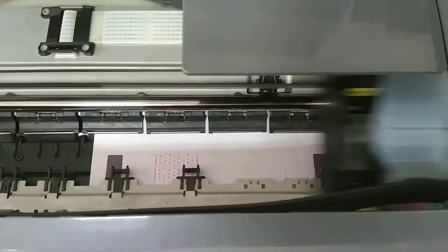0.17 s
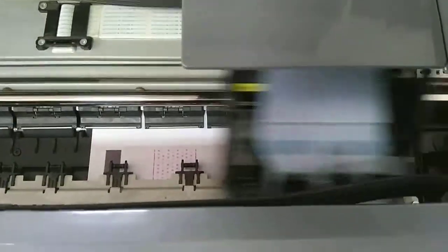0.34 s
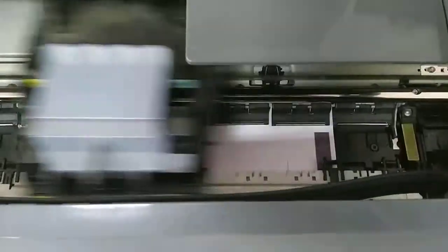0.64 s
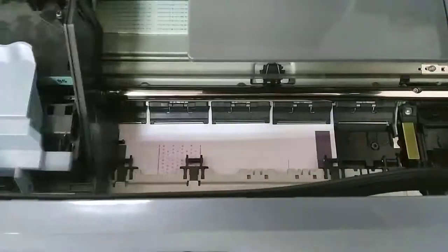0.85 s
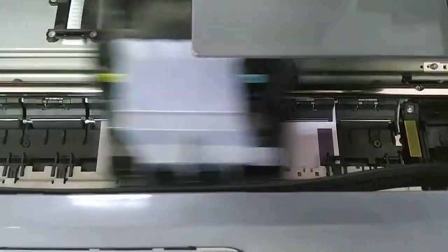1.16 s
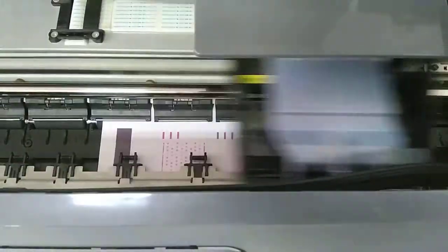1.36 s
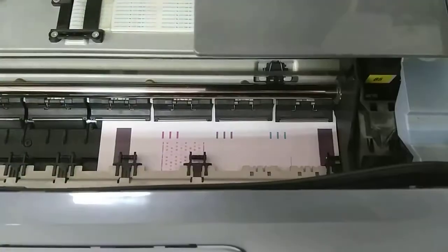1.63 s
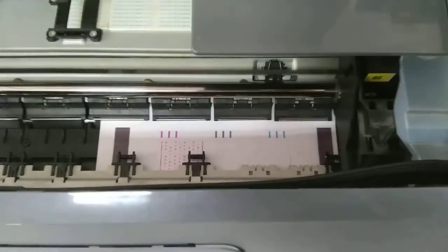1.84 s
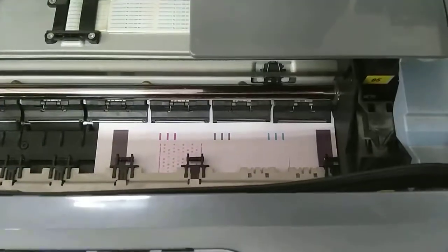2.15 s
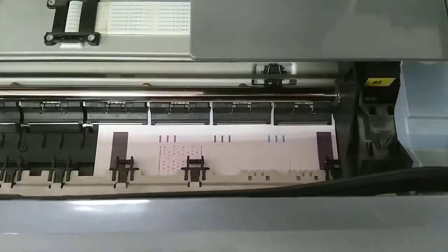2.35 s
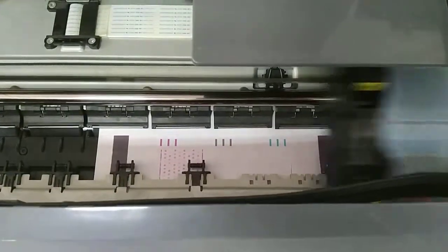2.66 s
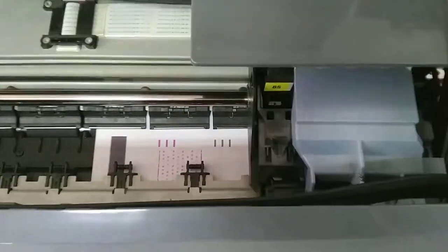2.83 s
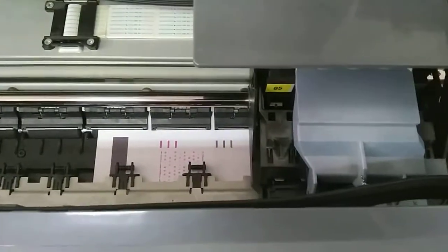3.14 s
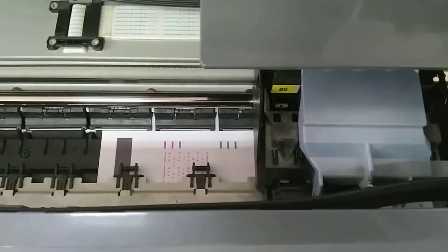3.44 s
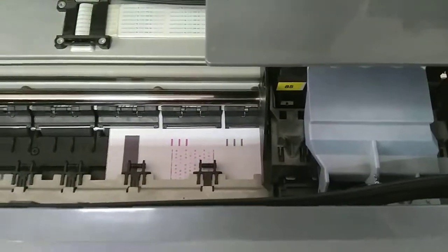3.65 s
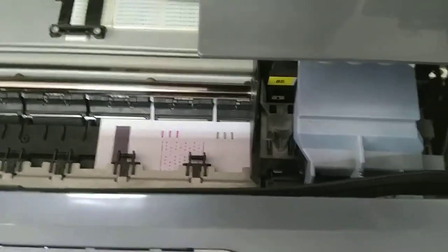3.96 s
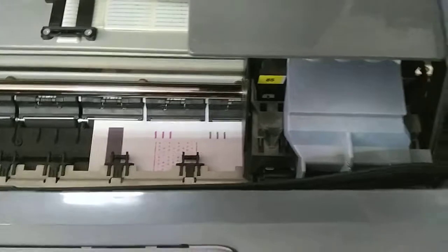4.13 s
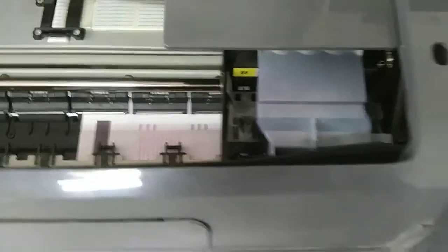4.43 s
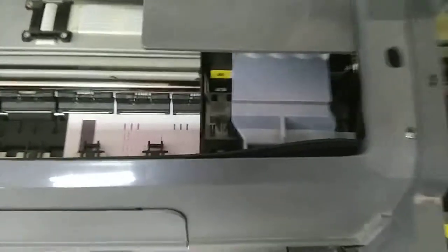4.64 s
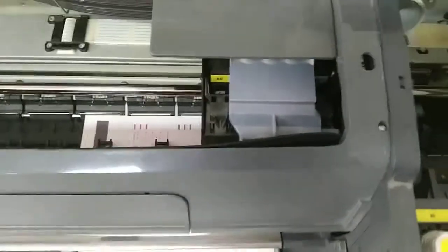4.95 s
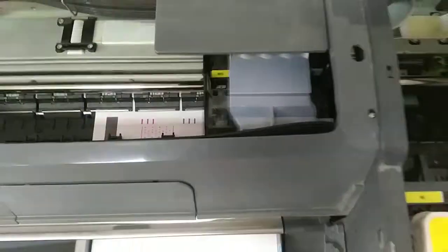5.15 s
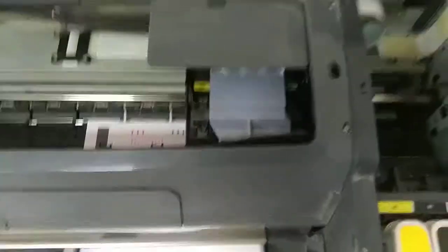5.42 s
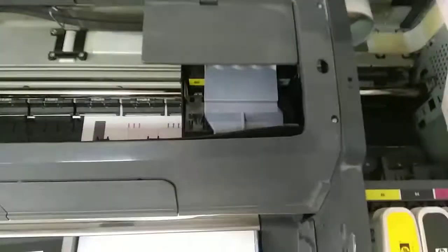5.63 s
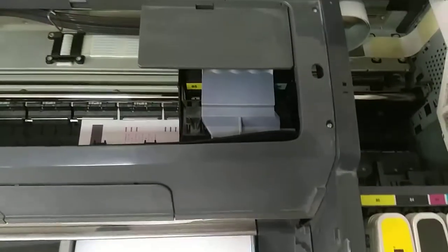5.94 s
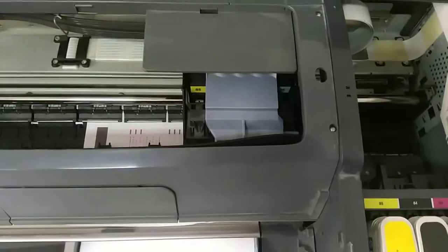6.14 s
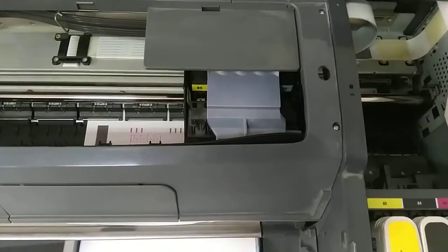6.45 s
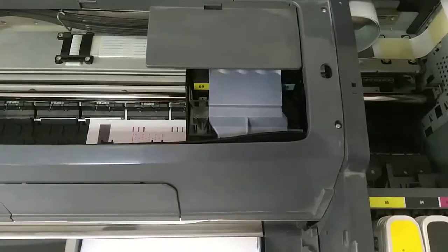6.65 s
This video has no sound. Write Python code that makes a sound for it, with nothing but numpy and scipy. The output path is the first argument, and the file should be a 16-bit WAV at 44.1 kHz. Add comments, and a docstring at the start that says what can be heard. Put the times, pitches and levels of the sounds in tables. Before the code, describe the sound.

Two airy carriage sweeps, then near stillness over a steady fan, then a clack and brief slides. A small geared motor starts humming and whirring; tiny snaps and a tinny rattle precede clustered loud clacks of latches in a plastic case, which continue irregularly to the end. The handheld microphone is close, catching dry finger knocks and grainy rubbing, mostly on the right.

```python
"""Wide inkjet printer at work

Heard from a handheld phone with two microphones: the carriage hisses along its rail (shaped noise) and stops,
then a service motor whirrs (noise plus gear-mesh lines); latches and gears clack and tick in the plastic case
(noise bursts, decaying rings), a small metal part chatters (high modes). Narrow noise flickers faintly near
15.7 kHz. A finger taps or rubs the phone (short knocks, grainy noise). A fan hums behind (noise, blade line).
"""
import sys
import numpy as np
from scipy import signal
from scipy.io import wavfile
from scipy.ndimage import uniform_filter1d

SR = 44100
rng = np.random.default_rng(int(sys.argv[2]) if len(sys.argv) > 2 else 0)


def log_audio(samples):
    """Write samples as a 16-bit WAV file to the path given in sys.argv[1]."""
    # one column per channel
    frames = np.atleast_2d(samples).T
    # limit to full scale, then quantise
    limited = np.clip(frames, -1, 1)
    pcm = np.round(limited * 32767).astype(np.int16)
    wavfile.write(sys.argv[1], SR, pcm)


N = 299439
LAG = 16  # delay of the right microphone [samples]

# bass delay of the right microphone: (frequency [Hz], phase lag [rad])
LOW_LAG = [(170, 1.65), (700, 0.72), (1000, 1.02), (1200, 1.92), (1400, 1.6), (1700, 4.36)]


def amp(db):
    """Amplitude factor of a level in dB."""
    return 10 ** (np.asarray(db) / 20)


def evened(x):
    """Scale to RMS 1."""
    return x / np.sqrt(np.mean(x ** 2) + 1e-20)


def read(points, hz):
    """Interpolate a (frequency, value) table over log frequency."""
    f, value = np.transpose(points)
    return np.interp(np.log(hz + 1), np.log(f + 1), value)


def add(mix, s, sound):
    """Add a stereo sound into the mix at s seconds."""
    part = mix[:, round(s * SR):][:, :sound.shape[1]]
    part += sound[:, :part.shape[1]]


def resonate(x, hz, width_hz):
    """One decaying, turning pole: a resonance of gain about 1."""
    r = np.exp(-np.pi * width_hz / SR)
    return 2 * signal.lfilter([1 - r], [1, -r * np.exp(2j * np.pi * hz / SR)], x).real


def band(x, lo_hz, hi_hz):
    """Butterworth bandpass."""
    sos = signal.butter(2, [lo_hz, min(hi_hz, 20000)], "bandpass", fs=SR, output="sos")
    return signal.sosfilt(sos, x)


def held(start, stop, db, rise, fall, drop_db):
    """Gain that climbs in dB from db + drop_db to db, holds, sinks back and ends."""
    gain, on = np.zeros(N), slice(max(round(start * SR), 0), round(stop * SR))
    t = np.arange(N)[on] / SR
    ramp = np.maximum(1 - (t - start) / rise, 1 - (stop - t) / fall)
    gain[on] = amp(db + drop_db * np.clip(ramp, 0, 1))
    return uniform_filter1d(gain, size=120)


def placed(pair, pan_db):
    """Set left over right by pan_db, half on each side."""
    return pair * amp([[pan_db / 2], [-pan_db / 2]])


def noise(colour, patchy_db):
    """Noise at both microphones, partly alike, late on the right, in drifting patches; their mean has level 1."""
    # left-right balance of the microphones: (frequency [Hz], left over right [dB])
    balance = [(150, -5.5), (250, -3.5), (600, 1), (1400, 0.5), (2500, 2.5), (5500, 3.5), (7500, 8),
               (10500, 15.5), (12500, 8.5), (15500, -6.5)]
    # left-right likeness: (frequency [Hz], correlation [0-1])
    likeness = [(150, 0.92), (700, 0.6), (950, 0.91), (1250, 0.89), (1600, 0.62), (2200, 0.085),
                (12000, 0.012)]
    frames, hz = N // 256 + 5, np.fft.rfftfreq(1024, 1 / SR)[:, None]
    a, b, c, d, patches = rng.standard_normal((frames, 513, 5)).T
    patches = uniform_filter1d(patches, size=3, axis=0)
    patches = evened(uniform_filter1d(patches, size=5, axis=1))
    late_rad = np.where(hz < 1700, read(LOW_LAG, hz), 2 * np.pi * hz * LAG / SR)
    same = np.clip(read(likeness, hz), 0, 1)
    left = a + 1j * b
    right = (same * left + np.sqrt(1 - same ** 2) * (c + 1j * d)) * np.exp(-1j * late_rad)
    tilt = amp(read(balance, hz) / 2)
    spectra = np.array([left * tilt, right / tilt]) * amp(read(colour, hz) + patchy_db * patches)
    pair = signal.istft(spectra, nperseg=1024, noverlap=768)[1][:, :N]
    return pair / np.std(pair.mean(0))


def tone(hz, waver_hz, waver_db):
    """Sine line that wavers slowly in pitch and level, late on the right."""
    drift, swell = (evened(uniform_filter1d(uniform_filter1d(v, size=1500), size=1500))
                    for v in rng.standard_normal((2, N)))
    phase = 2 * np.pi * np.cumsum(hz + waver_hz * drift) / SR
    line = np.sqrt(2) * amp(waver_db * swell) * np.sin(phase)
    return np.array([line, np.roll(line, LAG)])


def carriage():
    """Bearings and belt hiss while the carriage moves; two resonances swell with its place on the rail."""
    # hiss spectrum: (frequency [Hz], density [dB per Hz])
    rail = [(120, -20), (300, -4.5), (560, 1), (700, -5.5), (950, -7), (1500, -13), (2000, -7), (2900, -13),
            (6800, -12), (7600, -12.5), (10700, -14.5), (13500, -15.5), (16000, -21)]
    # passes: (start [s], stop [s], level [dB], braking [s], from place, to place [0 right - 1 left])
    passes = [(-0.008, 0.162, -42.5, 0.069, 0.18, 0.19), (0.219, 0.925, -45, 0.051, 0.033, 1),
              (0.953, 1.66, -44.5, 0.096, 1, 0.035), (2.712, 2.936, -44, 0.065, 0.042, 0.089),
              (2.96, 3.31, -49.5, 0.09, 0.079, 0.28)]
    # broad resonances of the hiss: (frequency [Hz], width [Hz])
    humps_hz = [(8100, 2200), (10600, 2600)]
    # resonances along the rail: (place [0 right - 1 left], lower over hiss [dB], upper over hiss [dB])
    along_rail = [(.0, -33, -32), (.2, -20, -11), (.45, -8, -6), (.75, -6, -7), (.99, -14, -24)]
    speed_up_s, drop_db = 0.022, -7.5
    mid_pass_db = -2
    idle_stop_s, idle_db = 3.25, -54  # rail drive hisses faintly at rest until switched off

    rush, t = noise(rail, patchy_db=2.7), np.arange(N) / SR
    moves = []
    for start, stop, db, brake_s, _, _ in passes:
        bow_db = mid_pass_db * np.sin(np.pi * (t - start) / (stop - start))
        moves.append(held(start, stop, db, speed_up_s, brake_s, drop_db) * amp(bow_db))
    moving = np.max(moves, axis=0)
    times = np.ravel([row[:2] for row in passes])
    place = np.interp(t, times, np.ravel([row[4:] for row in passes]))
    at, *levels = np.transpose(along_rail)
    humps = 0
    for (hz, width_hz), db in zip(humps_hz, levels):
        hump = evened(resonate(resonate(rush, hz, width_hz), hz, 2 * width_hz))
        humps = humps + amp(np.interp(place, at, db)) * hump
    hiss = np.maximum(moving, amp(idle_db) * (t < idle_stop_s)) * rush
    return hiss + moving * np.std(rush) * humps


def motor():
    """Service motor: gear whirr, a singing mount, gear-mesh lines under load and a faint whistle."""
    # whirr spectrum: (frequency [Hz], density [dB per Hz])
    whirr = [(88, -53), (150, -18.5), (434, -4.5), (518, 1), (738, -11.5), (1010, -3.5), (2550, -14.5),
             (3930, -10), (4690, -15.5), (11800, -16.5), (15600, -23.5)]
    # ringing motor mount: (frequency [Hz], width [Hz], level over whirr [dB])
    mount = [(1030, 140, -8)]
    # gear-mesh lines: (multiple of shaft speed, relative level [dB])
    mesh = [(10, .5), (18, -8), (19, -10), (20, -7), (21, -8), (22, -9)]
    # motor runs: (start [s], stop [s], level [dB])
    runs = [(3.235, 5.12, -46), (5.06, 5.286, -51.5), (5.234, 6.22, -46.5), (6.1, 6.9, -48.5)]
    # loaded spells: (start [s], stop [s], gain of the mesh lines [dB])
    loads = [(3.24, 4.305, -49.5), (4.3, 5.0, -65), (5.52, 6.043, -58.5)]
    shaft_hz = 52.2
    spin_up_s, run_down_s, drop_db = 0.01, 0.077, -8
    load_on_s, load_off_s = 0.011, 0.12

    lines = sum(amp(db) * tone(k * shaft_hz, waver_hz=.15 * k, waver_db=1.7) for k, db in mesh)
    air = rng.standard_normal((2, N))
    whistle_gain = held(3.0, 4.3, db=-61.5, rise=.01, fall=.4, drop_db=-1)
    whistle = evened(resonate(air, 5930, 64)) * whistle_gain
    gears = noise(whirr, patchy_db=1.6)
    rings = sum(amp(db) * evened(resonate(air, hz, width_hz)) for hz, width_hz, db in mount)
    running = np.max([held(*row, spin_up_s, run_down_s, drop_db) for row in runs], axis=0)
    load = sum(held(*row, load_on_s, load_off_s, -22) for row in loads)
    return running * (gears + rings) + load * lines + whistle


def clacks():
    """Gear and latch blows: a lumpy rattle of treble, middle and case ring, with a slower tail in the housing."""
    # blows: (time [s], level [dB], ring over level [dB], treble over level [dB], ring [Hz],
    #         left over right [dB], rise [s])
    blows = [(0.958, -33, -5, 0, 2250, 0, 0.004), (1.665, -45.5, -8, 4, 573, 3, 0.004),
             (2.725, -30.5, -10.5, -1.5, 1980, -3.5, 0.0012), (2.893, -42, -5, -14, 540, -3, 0.0032),
             (2.962, -40.5, -9, -1.5, 583, 0, 0.0023), (3.248, -36.5, -3, -5, 1230, -1, 0.016),
             (4.212, -42.5, -21, 3, 600, 14, 0.0046), (4.274, -43.5, 4, 8.5, 550, 3.5, 0.01),
             (4.454, -22, -10, 0.5, 940, -0.5, 0.0063), (4.466, -29.5, -10.5, -2, 930, 1, 0.0044),
             (4.628, -24, -9, 1.5, 915, 3, 0.0051), (4.635, -16, -9, -0.5, 943, 0, 0.0016),
             (4.650, -31, -7, -16, 625, -9, 0.0023), (4.697, -35, -8, -24, 690, -14, 0.0014),
             (4.725, -38, -16, -3, 1020, -1, 0.0055), (4.7352, -32, -17, 2, 1020, 0, 0.0015),
             (4.8042, -35.5, 6.5, 1, 1040, -1, 0.00305), (4.810, -39.5, 10, -4, 508, -4, 0.0025),
             (4.823, -51.5, 15, -12, 230, -7, 0.0032), (5.288, -20.5, -7.5, -4, 2730, -1.5, 0.0023),
             (5.387, -51.5, 11.5, -10, 1120, 1, 0.004), (5.436, -40, -8, 2, 615, -11, 0.0015),
             (5.615, -48, 10, 3, 1010, -3, 0.003), (5.631, -45, 7, 3, 1290, -3, 0.002),
             (5.677, -42, -2, 1, 1850, -2, 0.0027), (5.883, -30.5, -10.5, -4, 534, 2, 0.0075),
             (5.896, -28.5, -11.5, 4, 590, -6, 0.00089), (6.085, -44, 2.5, 0, 1100, -6, 0.0015),
             (6.177, -27.5, -10, 1, 500, 2, 0.0021), (6.185, -15.5, -10.5, -0.5, 960, -4, 0.0018),
             (6.194, -37, 6, -14, 496, 3, 0.0013), (6.351, -18.5, -5, 1.5, 1036, -2.5, 0.0059),
             (6.354, -41.5, 11, -4, 331, 0, 0.002), (6.369, -36.5, 5.5, -11, 545, 4, 0.0029),
             (6.515, -43, 9, -18, 1180, 3, 0.006), (6.528, -15, -15.5, 1, 613, -6.5, 0.0031),
             (6.545, -27, -10, -9, 626, 1, 0.005)]
    # rattle spectrum: (frequency [Hz], density [dB per Hz])
    case = [(880, 15.5), (1500, 12), (2380, 11.5), (3090, 15.5), (3380, 13.5), (3850, 15.5), (4950, 20),
            (9500, 9.5), (15100, 0), (16000, -39)]
    # case modes: (frequency [Hz], width [Hz], relative level [dB])
    case_modes = [(1824, 590, -1.5), (3000, 70, -28), (3830, 99, -11.5), (4460, 260, -43), (5600, 530, -19)]
    modes_db, mode_spread_db = -4, 3.0  # each blow strikes the modes differently
    rattle_t60_s, t60_per_rise = 0.028, 4.2  # soft blows rattle on longer
    fuzz_width, fuzz_share, swell_s = .4, .48, .0035  # (width over ring pitch), (gain), (panel swell)

    out, t, rattle = np.zeros((2, N)), np.arange(12000) / SR, noise(case, patchy_db=1.2)
    middle = evened(band(rattle, 1700, 6000))
    treble = evened(band(rattle, 5500, 16500))
    # loose parts strike again
    bounces = rng.exponential(1.2, N).clip(0, 1.8) * (rng.random(N) < 260 / SR)
    lumps = evened(1.3 + signal.lfilter([1], [1, -np.exp(-1 / (.0007 * SR))], bounces))
    body = noise([(100, -20), (250, 0), (3500, 0), (6000, -30)], patchy_db=1.2)
    thud = evened(band(body, 200, 1800))
    modes = np.array([amp(db) * evened(resonate(rattle, hz, width_hz)) for hz, width_hz, db in case_modes])
    strikes = amp(modes_db + mode_spread_db * rng.standard_normal((len(blows), len(case_modes))))
    for (s, db, ring_db, treble_db, hz, pan_db, rise), struck in zip(blows, strikes):
        t60 = rattle_t60_s + t60_per_rise * rise
        at = slice(round(s * SR), round(s * SR) + len(t))
        u = t[:len(lumps[at])]
        start = np.clip(u / max(rise, 1e-4), 0, 1) ** 2.0
        after = np.maximum(u - rise, 0)
        quick = start * amp(-60 * after / t60) * lumps[at]
        shape = quick + start * amp(-17.5 - 60 * after / 0.66)  # with housing tail

        width_hz = fuzz_width * hz
        fuzz = evened(resonate(resonate(body[:, at], hz, width_hz), hz, width_hz)) + .65 * thud[:, at]
        fuzz_gain = fuzz_share * amp(-60 * after / (1.23 * t60)) + amp(-20 - 60 * after / 0.5)
        swell = after / (swell_s + .15 * rise)
        phase = 2 * np.pi * hz * after - np.array([[0], [read(LOW_LAG, hz)]])
        panel = 1.05 * swell * np.exp(1 - swell) ** 1.54 * np.sin(phase)
        low = panel + fuzz * start * fuzz_gain

        high = amp(-3.0) * middle[:, at] + amp(treble_db) * treble[:, at]
        case_ring = quick * np.tensordot(struck, modes[:, :, at], 1) / 2
        add(out, s, amp(db) * placed(shape * high + case_ring + amp(ring_db) * low, pan_db))
    return out


def ticks():
    """Gear teeth snapping: a few treble cycles, each with a short rattle and a middle ring."""
    # snaps: (time [s], level [dB], middle over level [dB], snap [Hz], snap left over right [dB])
    snaps = [(3.685, -16, -7, 9500, 25), (3.69, -13, -7.5, 8260, 9), (3.695, -17.5, -0.5, 7700, 17),
             (4.03, -21, -21, 9100, 19.5), (5.850, -19.5, -17, 12200, 9)]
    out, t = np.zeros((2, N)), np.arange(400) / SR
    draws = rng.standard_normal((len(snaps), 2, 400))
    for (s, db, middle_db, hz, pan_db), grit in zip(snaps, draws):
        snap = np.sin(2 * np.pi * hz * t) * (t / 0.00037) * np.exp(1 - t / 0.00017)
        snap = snap + amp(-14.5) * evened(band(grit, 2600, 12700)) * np.exp(-t / 0.0022)
        middle = amp(middle_db) * np.sin(2 * np.pi * 1950 * t) * np.exp(-t / 0.0009)
        add(out, s, amp(db) * (placed(snap, pan_db) + middle))
    return out


def chatter():
    """Small metal part: quick uneven knocks ring high modes; the two lowest vary from burst to burst."""
    # bursts: (start [s], stop [s], level [dB], build-up [s], dying [s], lowest mode [dB], second mode [dB])
    bursts = [(4.043, 4.077, -41, 0.033, .004, 6, -8), (4.072, 4.112, -39.5, .003, 0.028, 7, -10),
              (4.096, 4.137, -37, 0.024, 0.0058, -2, 6), (4.135, 4.22, -47.5, 0.011, 0.035, -10, 0),
              (4.263, 4.299, -30, 0.0047, .034, 3, -3.5), (4.292, 4.363, -42.5, .005, 0.056, -10, -2)]
    # modes: (frequency [Hz], width [Hz], relative level [dB])
    metal_modes = [(7700, 80, 1), (8310, 60, 8), (8670, 50, 11), (9330, 100, -5)]
    fade_db = -12

    heights = amp(1.6 * rng.exponential(1, (4, N)).clip(0, 4))
    hits = rng.random((4, N)) < 700 / SR
    knocks = heights * hits * rng.choice([-1, 1], (4, N))
    low, second, *upper = (amp(db) * evened(resonate(resonate(k, hz, width_hz), hz, 500))
                           for k, (hz, width_hz, db) in zip(knocks, metal_modes))
    upper = sum(upper)
    ring = 0
    for start, stop, db, rise, fall, low_db, second_db in bursts:
        mixture = amp(low_db) * low + amp(second_db) * second + upper
        ring = ring + held(start, stop, db, rise, fall, fade_db) * mixture
    ring = ring / np.std(low + second + upper)
    return placed(np.array([ring, np.roll(ring, LAG)]), 8.1)


def taps():
    """Finger taps on the phone: a knock sinking in pitch; the shell carries grit and a slowing low swing."""
    # taps: (time [s], level [dB], swing over level [dB], grit over level [dB], knock [Hz],
    #        knock left over right [dB])
    touches = [(0.3093, -17.5, -.5, -3, 2350, -22.5), (3.8541, -25.5, -2, -9, 1870, -19),
               (5.1668, -23.5, -20, -14, 2380, -31), (5.1744, -29, -13, -11, 2300, -20),
               (5.1755, -33, -15, -4, 2100, -20), (5.473, -30, -3, 0, 2070, -10),
               (5.5451, -28.5, -6, -11, 1600, 10), (6.0504, -20, -12, -14, 2950, -27.5)]
    out, t = np.zeros((2, N)), np.arange(400) / SR
    draws = rng.standard_normal((len(touches), 2, 400))
    for (s, db, swing_db, grit_db, hz, pan_db), grit in zip(touches, draws):
        turns = hz * (t - .0004)
        envelope = np.exp(-np.where(turns < 0, 3.2 * turns ** 2, 1.5 * turns))
        knock = -np.cos(2 * np.pi * turns / np.sqrt(1 + .25 * turns.clip(0))) * envelope
        burst = evened(band(grit, 2500, 14000)) * np.exp(-((t - .0004) / .0004) ** 2)
        swing = np.sin(2 * np.pi * 720 * t / np.sqrt(1 + t / .002)) * (t / .0008) * np.exp(1 - t / .0008)
        swing = np.array([.8 * np.roll(swing, LAG), 1.1 * np.roll(swing, 2 * LAG + 8)])
        add(out, s, amp(db) * (placed(knock, pan_db) + amp(grit_db) * burst + amp(swing_db) * swing))
    return out


def rubs():
    """Skin slipping on the phone: grainy noise, mostly in the right microphone."""
    # strokes: (start [s], stop [s], level [dB], treble over level [dB])
    strokes = [(4.68, 4.71, -25.5, -2), (4.872, 4.925, -34.5, -2), (5.05, 5.083, -43, -1),
               (5.1515, 5.156, -31, -7), (5.272, 5.392, -39.5, 3), (5.376, 5.486, -39.5, 1)]
    on_share, off_share = 0.62, 0.57  # shares of the stroke that swell and fade
    roughness = evened(uniform_filter1d(rng.standard_normal(N), size=80))
    grain = rng.standard_normal((2, N)) * amp(1.4 * roughness)
    low, high = evened(band(grain, 1100, 7500)), evened(band(grain, 6500, 16500))
    rub = 0
    for start, stop, db, treble_db in strokes:
        length_s = stop - start
        gain = held(start, stop, db, on_share * length_s, off_share * length_s, drop_db=-12)
        rub = rub + gain * (low + amp(treble_db) * high)
    return placed(rub, -15.5)


def treble_flickers():
    """Faint flickers of narrow noise near 15.7 kHz: white noise through two equal resonances."""
    # flickers: (start [s], stop [s], level [dB])
    flickers = [(3.42, 3.48, -57), (3.57, 3.62, -59), (3.735, 3.89, -55), (3.905, 3.98, -51),
                (4.0, 4.188, -53), (4.255, 4.366, -45), (4.402, 4.47, -50)]
    hz, width_hz = 15650, 250
    narrow = evened(resonate(resonate(rng.standard_normal((2, N)), hz, width_hz), hz, width_hz))
    return narrow * sum(held(*row, .02, 0.046, -15) for row in flickers)


def fan():
    """Steady air noise and the blade-passing line."""
    # air spectrum: (frequency [Hz], density [dB per Hz])
    air = [(80, -69), (150, -9.5), (260, 2), (480, -3.5), (720, -6), (950, -5.5), (1180, -8), (1370, -5),
           (1520, -10), (3600, -18), (3820, -12.5), (4500, -26.5), (9800, -25), (12800, -72), (16000, -49)]
    air_db, blade_hz, blade_db = -50, 604.6, -50
    blades = placed(tone(blade_hz, waver_hz=1.5, waver_db=.7), -2)
    return amp(air_db) * noise(air, patchy_db=2.0) + amp(blade_db) * blades


def scene():
    """Sum of all sources at the two microphones."""
    printer = carriage() + motor() + clacks() + ticks() + chatter() + fan()
    return printer + taps() + rubs() + treble_flickers()


def record(dry):
    """The phone cuts the deep bass and the top of the treble."""
    edge_hz = 16050
    thin = signal.sosfilt(signal.butter(3, 140, "highpass", fs=SR, output="sos"), dry)
    lowpass = signal.firwin(511, edge_hz, window=("kaiser", 9), fs=SR)
    return signal.oaconvolve(thin, lowpass[None], "same")


dry = scene()
out = record(dry)
log_audio(out)
```